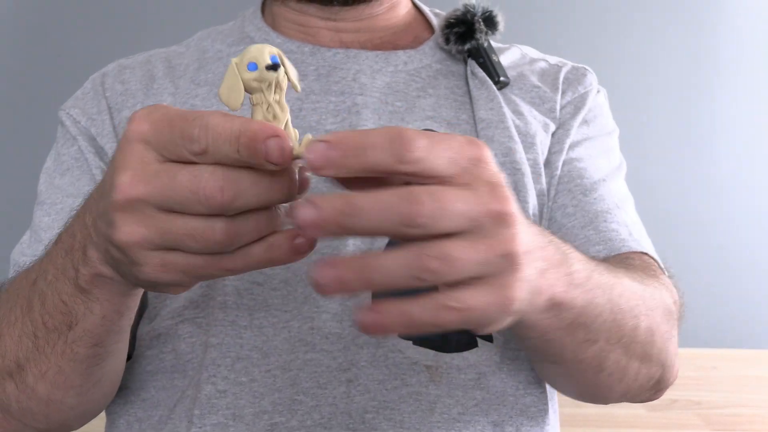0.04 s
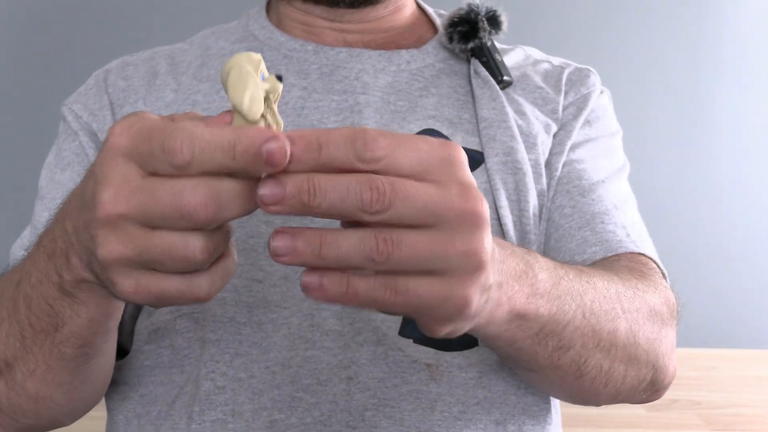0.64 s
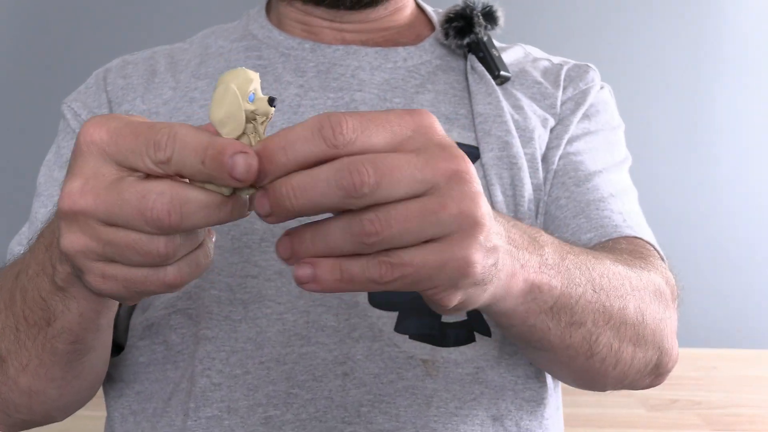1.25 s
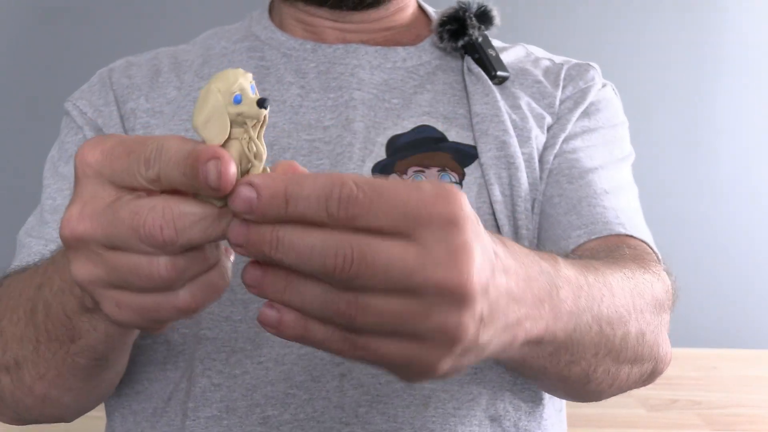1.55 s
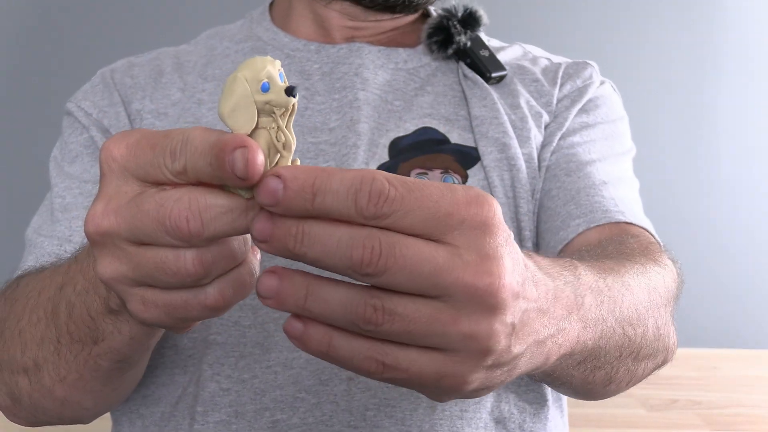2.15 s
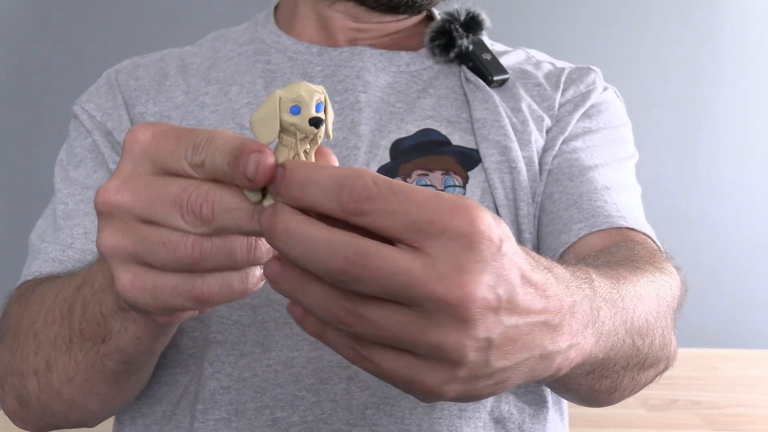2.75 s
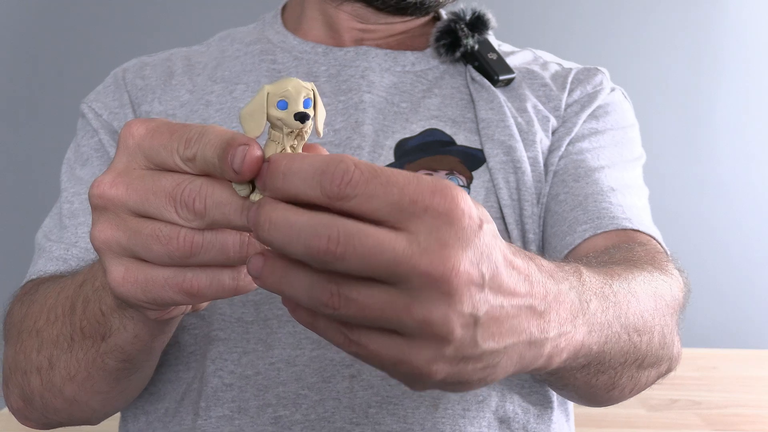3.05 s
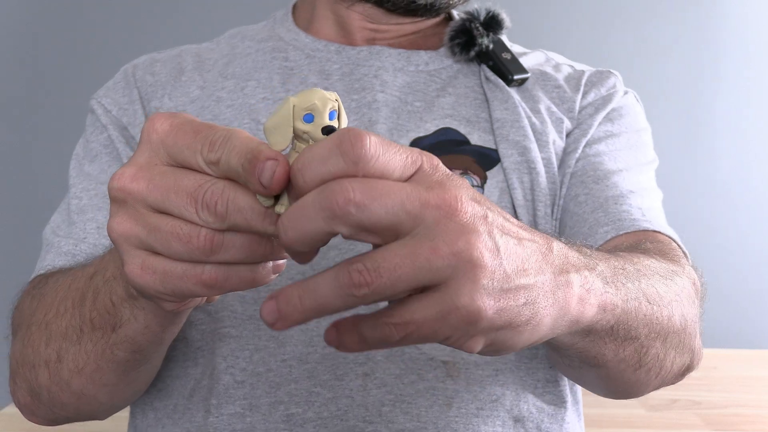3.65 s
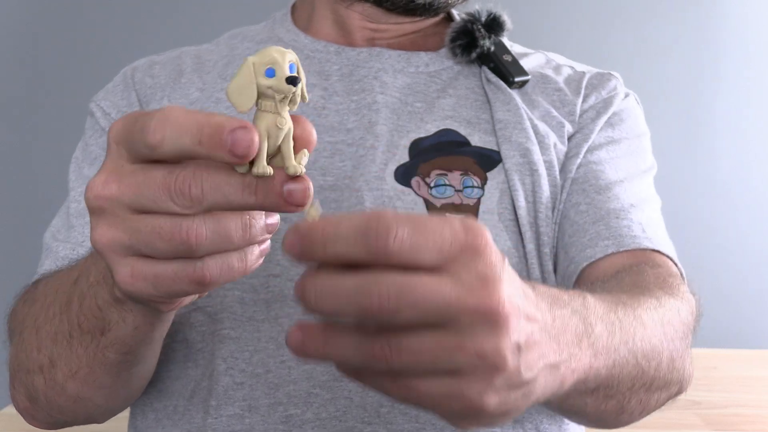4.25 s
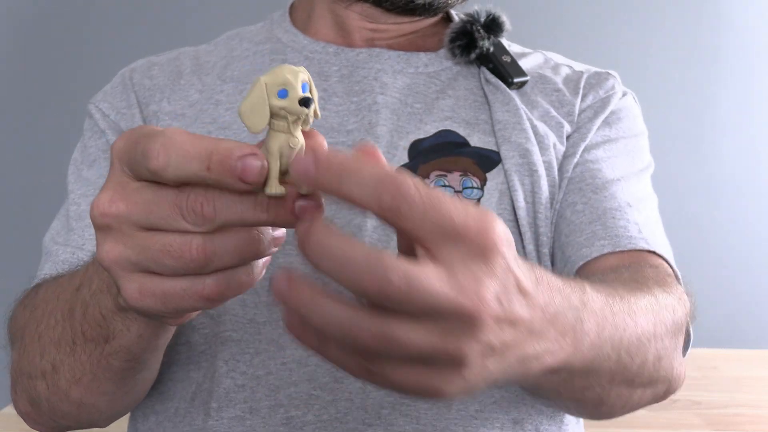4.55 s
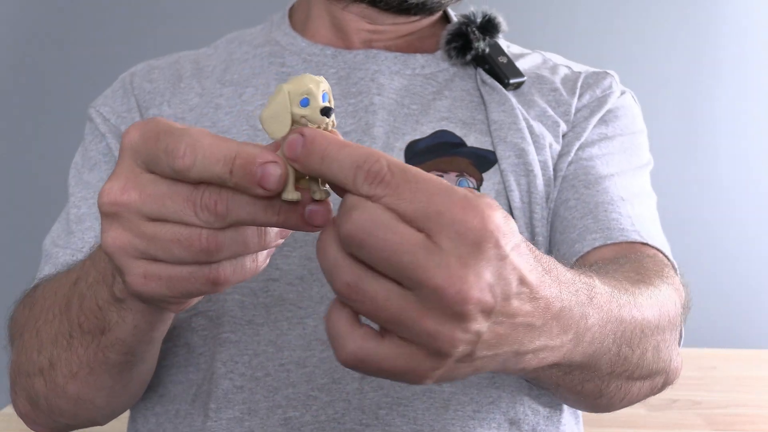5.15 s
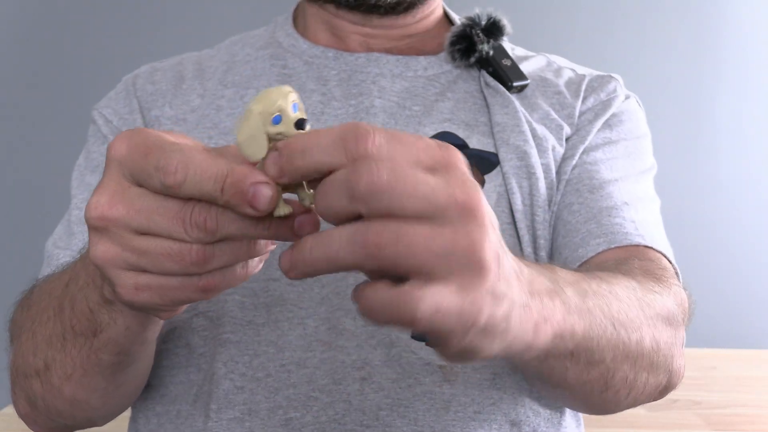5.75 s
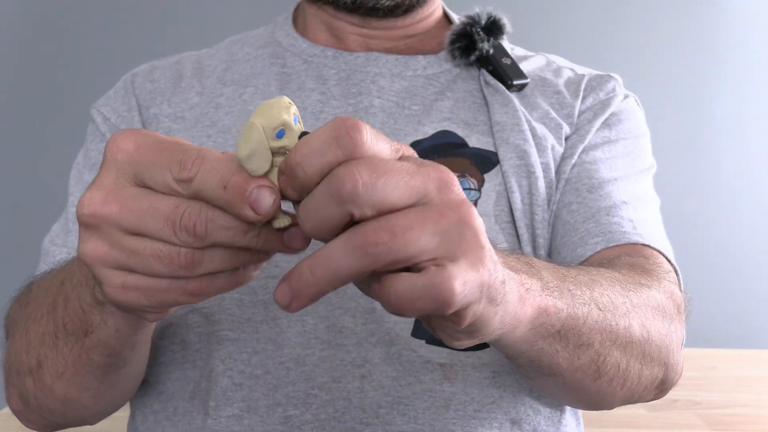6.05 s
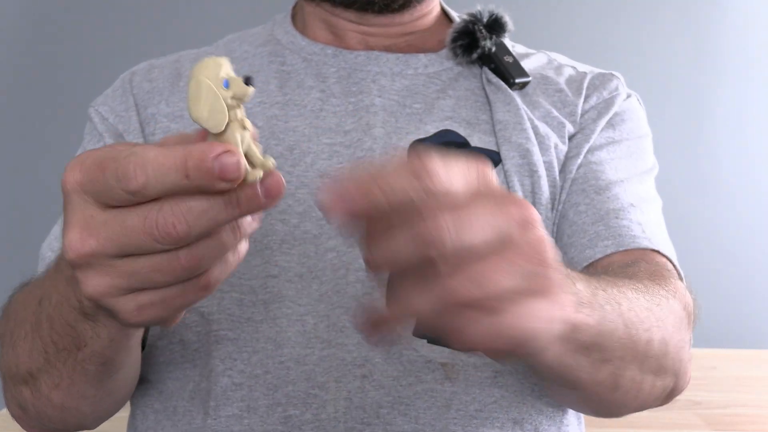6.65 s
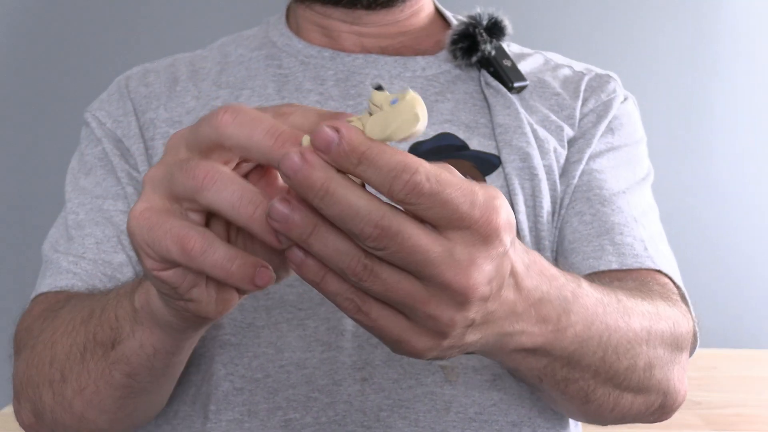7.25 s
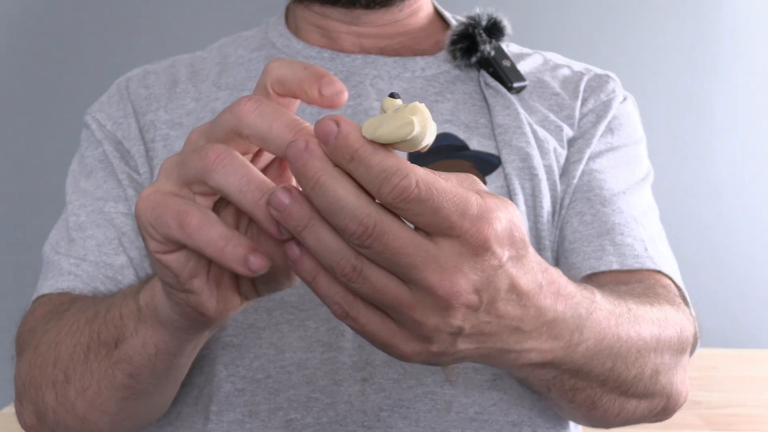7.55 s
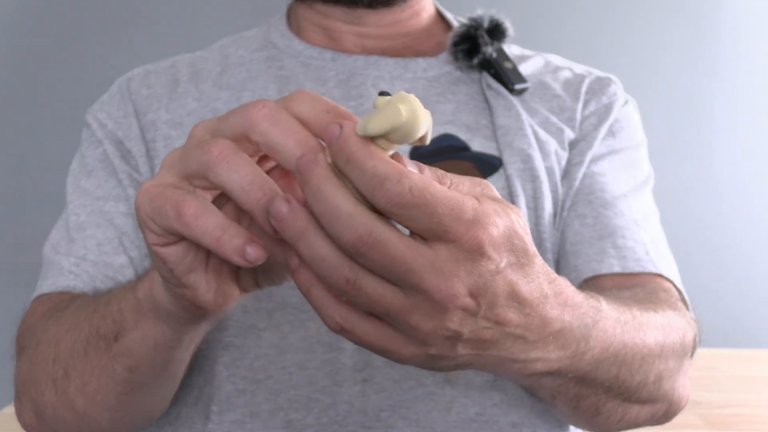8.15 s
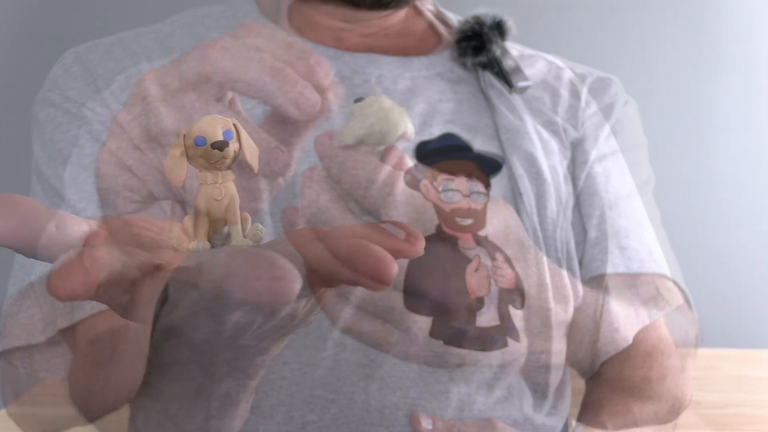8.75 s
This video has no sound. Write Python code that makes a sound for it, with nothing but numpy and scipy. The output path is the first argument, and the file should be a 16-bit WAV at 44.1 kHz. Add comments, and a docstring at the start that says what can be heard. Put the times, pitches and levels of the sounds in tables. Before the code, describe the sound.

In a quiet room with a faint hum and a slight echo, a small plastic figure is picked clean by hand near the microphone. Soft knocks and light fingertip scrapes surround a single click, before the thin supports snap in two tight bursts of high, brittle cracks. Dull wooden knocks sound farther away, a shorter crackle follows, then more knocks and a last little snap. A distant engine is barely audible midway.

```python
"""Fingers snap printed supports off a small plastic figure, close by in a quiet, lightly echoing room.
Each support breaks with a millisecond crack that rings near 9 kHz; a few ring on faintly once free,
and one gives way with two low thuds. Between the breaks, fingertips scrape over the print's ridges.
Duller, woody knocks come from farther off in the room, over air, a faint hum and a distant engine."""
import sys
import numpy as np
from scipy import signal
from scipy.fft import rfft, irfft
from scipy.io import wavfile

SR = 44100
rng = np.random.default_rng(int(sys.argv[2]) if len(sys.argv) > 2 else 0)


def wav_record(signal):
    """Record a signal, one row per channel, as 16-bit PCM in the file named by sys.argv[1]."""
    frames = np.transpose(np.atleast_2d(signal))
    bounded = np.clip(frames, -1, 1)
    # unit amplitude maps onto the largest positive 16-bit level
    quanta = np.round(bounded * 32767).astype(np.int16)
    wavfile.write(sys.argv[1], SR, quanta)


N = 397341

# how long the room's echo takes to fade by 60 dB: (frequency [Hz], fade time [s])
ECHO_FADE = [(200, 0.42), (800, 0.47), (1500, 0.49), (2200, 0.27), (5000, 0.3907), (9000, 0.34),
             (12500, 0.32), (15000, 0.27)]
# the tone of that echo: (frequency [Hz], gain [dB])
ECHO_TONE = [(200, -14), (1500, -10), (3000, -9), (4300, -3.5), (7000, -2), (9000, -2.5), (11000, -4),
             (13500, -9.5), (15800, -9.5)]
# the tone of the room's air: (frequency [Hz], gain [dB])
AIR_TONE = [(12, -27), (20, 1), (65, -5), (81, -13.5), (120, -8), (146, -20.5), (177, -15.5), (285, -13.5),
            (434, -18), (574, -15), (759, -17.5), (949, -20), (2400, -30.5), (4180, -32.5), (8410, -33),
            (16000, -40)]
# standing waves, the notes the room picks out of the air: (pitch [Hz], width [Hz], boost [dB])
STANDING_WAVES = [(58.6, 5, 5), (177.6, 8, 5), (243, 10, 3), (297, 24, 4), (467, 20, 6.5), (595, 20, 4.5),
                  (655, 30, 3.5), (927, 18, 8)]
# mains hum: (pitch [Hz], level [dB])
HUM_NOTES = [(59.5, -79.5), (119.8, -87), (236, -89)]
# the far engine's main note: (time [s], pitch [Hz], level [dB])
ENGINE_PATH = [(2.9, 89.1, -84), (3.4, 89.1, -78), (4.2, 90.92, -72.5), (4.549, 89.8, -71.5),
               (4.8, 82.2, -71.5), (5.25, 80.37, -70.5), (5.65, 80.9, -73), (5.9, 80.9, -91)]

# dull knocks, and two low thuds near 6.2 s as a support gives way: (time [s], level [dB],
# low edge [Hz], high edge [Hz], contact tick [dB], clack pitch [Hz], direct sound [dB])
KNOCKS_AND_THUDS = [(0.4227, -53.5, 424, 1500, -11.5, 2820, -19),
                    (0.426, -47.5, 510, 1620, -12.5, 760, -10), (.755, -55, 790, 1910, -18.5, 2675, -21),
                    (0.9253, -68, 886, 1920, -12, 3500, -10), (1.052, -68.5, 494, 2920, -10.5, 1270, -9),
                    (1.076, -75.5, 900, 3300, -14, 3180, -10), (4.5401, -53.5, 839, 2850, -19, 2420, -14),
                    (4.918, -63, 2083, 3200, -21, 2620, -23), (4.9882, -42.5, 460, 700, -35, 570, -5.5),
                    (4.9927, -43.5, 560, 1150, -25.5, 800, -9), (5.283, -59.5, 573, 1370, -26.5, 3250, -16),
                    (5.4764, -70.5, 698, 2130, -34, 1097, -14),
                    (5.6191, -70.5, 600.4, 3120, -30.5, 3120, -22),
                    (6.164, -62.5, 330.1, 3220, -14, 700, -9), (6.2071, -64, 277, 2600, -13, 590, -6),
                    (7.1421, -40.5, 645, 2220, -26.5, 590, -17),
                    (7.2079, -44.5, 950, 1930, -24.5, 2136, -27), (7.507, -59, 1010, 1703, -26, 1890, -10),
                    (7.7419, -64.5, 990, 2095, -24, 1885, -12), (8.003, -75, 2014, 2720, -22, 2720, -14),
                    (8.056, -74, 1700, 2900, -27.5, 2400, -20)]
# their woody ring: (pitch [Hz], energy relative to the blow [dB], time to fade 60 dB [s])
WOODY_NOTES = [(326.4, -26, 0.49), (470, -29, .35), (517.6, -28, 0.32), (551, -35.5, 0.37),
               (590, -23.5, 0.29), (763, -33, 0.19), (812.7, -23.5, 0.18), (984, -28.5, 0.34),
               (1074.4, -29, 0.57), (1286, -24, 0.33), (1356, -24.5, 0.23), (1443, -26.5, 0.45),
               (1660, -23, 0.43), (1773, -28, 0.37), (1900, -30, 0.32), (1950, -24.5, 0.31),
               (2120, -26.5, 0.46), (2250, -27, 0.32), (3750, -35, 0.35)]
# their hollow tone: (frequency [Hz], gain [dB])
HOLLOW_TONE = [(240, 3), (335, 4), (410, -5), (480, 1.5), (595, 3), (695, -3), (795, -0.5), (900, -6),
               (1000, 1.5), (1120, 0), (1200, -3.5), (1330, -1.5), (1480, 0.5), (1590, -4), (1730, 2.5),
               (1900, -1), (2050, 0), (2350, -0.5), (2900, 0), (3700, 1), (4300, -2.5), (5200, -4),
               (6500, -0.5)]

# firm scrapes: (middle time [s], length [s], level [dB], low resonance [Hz], its share [dB])
FIRM_SCRAPES = [(0.137, 0.068, -75, 4900, -14), (0.644, 0.0516, -74.5, 5200, -1),
                (1.013, 0.055, -70, 5040, -8), (1.128, 0.0377, -67, 5550, -6), (1.56, 0.12, -72, 5600, -16),
                (1.823, 0.31, -77.5, 5000, 2), (1.986, 0.088, -69.5, 5600, 4), (2, 0.014, -69, 5500, 0),
                (2.389, 0.059, -72, 5400, -3), (2.414, 0.042, -63.5, 5430, -1),
                (2.426, .012, -61.5, 5300, 4), (2.491, 0.0216, -63, 5600, 0), (2.703, 0.0334, -75, 4200, 6),
                (4.723, 0.048, -69.5, 5550, -6), (4.898, 0.021, -69, 5550, -6),
                (5.417, 0.046, -72.5, 5550, -3), (5.688, 0.038, -72, 5550, -17),
                (5.801, 0.035, -74, 5600, -9), (6.23, .02, -53.5, 5750, -11), (7.126, 0.087, -75, 5550, -4),
                (7.56, 0.048, -74.5, 5540, -5.5), (8.675, 0.044, -69, 5410, 1)]
# a scrape's low resonance: (multiple of its pitch, gain [dB])
SCRAPE_LOW_TONE = [(.02, -49.5), (.27, -16), (.54, -26), (.83, -6.5), (1, 1.5), (1.19, -10.5), (1.6, -17),
                   (2.9, -39)]
# a scrape's high resonance: (frequency [Hz], gain [dB])
SCRAPE_HIGH_TONE = [(100, -35), (3000, -14), (6700, -10), (8500, 1.5), (9500, -1), (10800, -9.5),
                    (12700, -9), (14000, -15), (16000, -38)]

# freed supports ringing on: (time [s], pitch [Hz], level [dB], time to fade 60 dB [s])
FREED_RINGS = [(6.166, 5790, -59, 0.28), (6.169, 8900, -50, 0.24), (6.227, 8580, -56, .08)]
# breaking supports; shares are relative to the main ring: (time [s], strength [dB], ring pitch [Hz],
# thock share [dB], thock pitch [Hz], body share [dB], body pitch [Hz], top share [dB],
# top tilt [dB/kHz], splinters [dB])
BREAKS = [(1.1602, -40.5, 8700, -15, 1390, -10, 5070, -4.5, -2, -21),
          (2.4913, -56.5, 8900, -30, 1400, 2, 5300, -4.5, 5, -16),
          (3.6425, -42.5, 9190, -10.5, 1403, -10, 5250, -4.5, 3, -24),
          (3.656, -70, 8500, -25, 1400, 0.5, 5300, -6, 0, -22),
          (3.6704, -20, 9200, -23.5, 1310, -10, 4890, -7, 1, -35),
          (3.6708, -23, 9355, -17, 1600, -7, 5070, -6, 1, -16),
          (3.678, -42, 8700, -21.5, 1400, -5, 5400, -1, 0.5, -18),
          (3.684, -42.5, 8300, -18, 1500, -3.5, 5300, -7.5, 0, -22.5),
          (3.6873, -25, 8850, -28, 1500, -12.5, 5050, -10.5, 3, -22),
          (3.6919, -45.5, 9200, -25.5, 1400, -2.5, 5100, 10, 5.5, -22.5),
          (3.7086, -37, 8950, -24, 1400, -10, 5100, -1.5, 4, -17.5),
          (3.7196, -35.5, 9100, -23, 1390, -11.5, 5030, -10.5, 2, -21.5),
          (3.721, -29, 9145, -20.5, 1360, -8, 5070, -6.5, 5, -23),
          (3.8655, -31.5, 9300, -26, 1290, -14.5, 5080, -9.5, 1, -22.5),
          (3.9146, -24.5, 8820, -17.5, 1217, -5.5, 5080, -9.5, -2, -19),
          (3.9157, -7, 9097, -24, 1420, -12, 5050, -10.5, -1, -28),
          (3.9227, -25.5, 8240, -23, 1700, -16, 5070, -14.5, -2, -21),
          (3.9255, -32, 9500, -17, 1600, -9.5, 5077, -14, 0, -12),
          (3.936, -28.5, 8380, -18.5, 1522, 3, 5100, -10.5, 0, -22),
          (3.941, -34.5, 8700, -22, 1400, -14, 5070, -16.5, 0, -15.5),
          (6.1641, -33, 8780, -9, 2000, -11.5, 3770, 0, 3, -30),
          (6.1685, -28, 8250, -26.5, 1289, -18, 5600, -7, -1, -21),
          (6.1728, -36, 8300, -12, 1580, -5, 5290, -4, 4, -10),
          (6.178, -49, 8400, -20, 1400, -14, 5700, -6, 0, -8.5),
          (6.183, -49, 8610, -20.5, 1400, -13, 5696, -5, -3, -8),
          (6.2065, -49, 8430, -3.5, 960, -5, 5700, -1, -0.5, -7),
          (6.219, -50, 8000, -5, 900, -9, 5750, -5, -7, -11),
          (8.1944, -51, 8500, -22, 1750, -3.5, 4020, 1, -2, -16),
          (8.195, -47.5, 10700, -30, 1746, -1, 4810, -9, -2, -19),
          (8.673, -65, 9100, 10, 2630, 0, 5080, -1, -3, -23)]
# the tone of the bare break, before the figure rings: (frequency [Hz], gain [dB])
BREAK_TONE = [(100, -46), (500, -21.5), (1200, -5), (2400, -2), (4500, 0.5), (16000, 1.5)]
# the figure's low notes, its "thock": (multiple of the thock pitch, width [Hz], gain [dB])
THOCK_NOTES = [(1, 520, 1), (1.5, 560, -1.5), (2.3, 560, -4.5), (3.05, 560, -2.5)]
# its body notes, below the main ring: (multiple of the body pitch, width [Hz], gain [dB])
BODY_NOTES = [(.83, 489, -6.5), (1, 619.7, 0), (1.22, 520, -1.5), (1.39, 402.4, -8.5)]
# its top notes, above the main ring: (pitch [Hz], width [Hz], gain [dB])
TOP_NOTES = [(11600, 600, 0), (12650, 750, 0), (14750, 800, -5)]


def gain_of(db):
    """Turns decibels into a number to multiply by."""
    return 10 ** (np.asarray(db) / 20)


def evened(x):
    """Scales a sound to an average (rms) level of 1."""
    return x / np.sqrt(np.mean(x ** 2) + 1e-30)


def read(points, hz):
    """Looks up a frequency in a table, with octaves evenly spaced."""
    f, value = np.transpose(points)
    return np.interp(np.log(hz + 1), np.log(f + 1), value)


def add(mix, s, sound):
    """Mixes a sound in, starting at s seconds."""
    part = mix[max(round(s * SR), 0):][:len(sound)]
    part += sound[:len(part)]


def coloured(x, points):
    """Filters a sound by a table of (frequency [Hz], gain [dB])."""
    return irfft(rfft(x) * gain_of(read(points, np.fft.rfftfreq(len(x), 1 / SR))), len(x))


def pulse(gain):
    """The most sudden click that has the given gain at each frequency."""
    log_gain = np.log(np.maximum(np.r_[gain, gain[-2:0:-1]], 1e-5))
    return np.fft.ifft(np.exp(np.conj(signal.hilbert(log_gain)))).real


def room_air(level_db=-67.5):
    """A soft rumble of air, stronger at the room's standing waves."""
    bins = np.fft.rfftfreq(N, 1 / SR)
    boost_db = sum(db / (1 + (2 * (bins - hz) / width) ** 2) for hz, width, db in STANDING_WAVES)
    spectrum = rfft(rng.standard_normal(N)) * gain_of(read(AIR_TONE, bins) + boost_db)
    return gain_of(level_db) * evened(irfft(spectrum, N))


def mains_hum():
    """The electric supply hums on a few steady notes."""
    t = np.arange(N) / SR
    return np.sqrt(2) * sum(gain_of(db) * np.sin(2 * np.pi * hz * t) for hz, db in HUM_NOTES)


def far_engine(overtone_ratio=1.6, full_speed_hz=91.3, fade_db_per_hz=1.4):
    """A distant engine drones; its overtone fades as it slows down."""
    t = np.arange(N) / SR
    times, *columns = np.transpose(ENGINE_PATH)
    hz, level_db = (np.interp(t, times, column) for column in columns)
    angle = 2 * np.pi * np.cumsum(hz) / SR
    overtone = gain_of(-0.5 + fade_db_per_hz * (hz - full_speed_hz)) * np.sin(overtone_ratio * angle)
    return np.sqrt(2) * gain_of(level_db) * (np.sin(angle) + overtone)


def echo_tail(size=18176):
    """A wash of echoes with energy 1; each frequency fades at its own speed."""
    hz, t, bands = signal.stft(rng.standard_normal(size), SR, nperseg=256)
    fade = gain_of(-60 * t / read(ECHO_FADE, hz)[:, None])
    echoes = signal.istft(bands * fade, SR)[1][:size]
    return echoes / np.linalg.norm(echoes)


def room_echo(x, table_s=0.012, table_db=-17, early_db=-3, build_s=0.0074):
    """One echo from the table top, and a wash that fills in as the walls answer."""
    echoes = coloured(np.pad(echo_tail(), (256, 0)), ECHO_TONE)[256:]
    t = np.arange(len(echoes)) / SR
    echoes *= gain_of(early_db * np.exp(-(t / build_s) ** 2))
    add(echoes, table_s, gain_of([table_db]))
    return signal.fftconvolve(x, echoes)


def knock_answer(direct_db, wash_db=-2, bounce_db=-3, bounce_s=.0038):
    """What one blow sets off: direct sound, a quick echo, the room's wash and a woody ring."""
    answer = gain_of(wash_db) * echo_tail()
    t = np.arange(len(answer)) / SR
    answer[0] += gain_of(direct_db)
    add(answer, bounce_s, gain_of([direct_db + bounce_db]))
    for hz, db, fade_s in WOODY_NOTES:
        note = np.sin(2 * np.pi * (hz * t + rng.random())) * gain_of(-60 * t / fade_s)
        answer += gain_of(db) * note / np.linalg.norm(note)
    return answer


def knocks_and_thuds(steepness=3.96, tick_edge_hz=9000, clack_width_hz=260, size=4096):
    """Dull knocks, and two low thuds as a support gives way; a softer contact sounds duller."""
    out, hz = np.zeros(N), np.fft.rfftfreq(size, 1 / SR) + 1
    tick = 1 / np.hypot(1, (hz / tick_edge_hz) ** 3)
    for s, db, low_hz, high_hz, tick_db, clack_hz, direct_db in KNOCKS_AND_THUDS:
        thud = 1 / np.hypot(1, (hz / high_hz) ** steepness)
        # each one clacks at its own pitch, less the further that lies above the high edge
        clack_gain = gain_of(-1) / np.hypot(1, clack_hz / high_hz)
        clack = clack_gain / (1 + ((hz - clack_hz) / clack_width_hz) ** 2)
        contact = np.hypot(thud + clack, gain_of(tick_db) * tick)
        bass_cut = 1 / np.hypot(1, (low_hz / hz) ** 3)
        blow = pulse(gain_of(read(HOLLOW_TONE, hz)) * contact * bass_cut)
        knock = signal.fftconvolve(blow, knock_answer(direct_db))
        add(out, s, gain_of(db) * knock / np.std(knock[:size // 2]))
    return out


def light_brushes(count=8, typical_s=.045, db=-83.5, low_hz=5400, low_db=-12):
    """Light touches at random moments as the figure is turned: rows like those of FIRM_SCRAPES."""
    return [(when * N / SR, typical_s * (.5 + stretch), db, low_hz, low_db)
            for when, stretch in rng.random((count, 2))]


def scrapes(slips_per_s=2500, spread_db=3):
    """A fingertip slips over the print's ridges in a swell of tiny clicks that stir two resonances."""
    out = np.zeros(N)
    for s, length, db, low_hz, low_db in FIRM_SCRAPES + light_brushes():
        size = int(length * SR)
        low_tone = [(ratio * low_hz, level) for ratio, level in SCRAPE_LOW_TONE]
        slips = (rng.random(size) < slips_per_s / SR) * rng.choice([-1, 1], size)
        slips = slips * gain_of(spread_db * rng.standard_normal(size))
        rub = coloured(slips, SCRAPE_HIGH_TONE) + gain_of(low_db) * coloured(slips, low_tone)
        add(out, s - length / 2, gain_of(db) * evened(rub) * np.hanning(size))
    return out


def freed_supports(wobble_hz=70):
    """A freed support rings on faintly and unevenly between the fingers."""
    out, t = np.zeros(N), np.arange(SR // 2) / SR
    smoothing = np.exp(-np.pi * wobble_hz / SR)
    for s, hz, db, fade_s in FREED_RINGS:
        wobble = evened(signal.lfilter([1], [1, -smoothing], rng.standard_normal(len(t))))
        ring = np.sin(2 * np.pi * np.cumsum(hz + wobble_hz * wobble) / SR)
        add(out, s, gain_of(db - 60 * t / fade_s) * ring)
    return out


def plastic_ring(notes, t):
    """Notes that swell and die within a millisecond or two, wider ones sooner; the peak is 1."""
    ring = 0
    for hz, width, db in notes:
        age = 2 * np.pi * width * t
        ring = ring + gain_of(db) * width * age ** 2 * np.exp(-age) * np.sin(2 * np.pi * hz * t)
    return ring / abs(ring).max()


def cracks(ring_width_hz=830, blur_width_hz=1400, splinter_s=0.0031, bass_cut_hz=730):
    """Each break is a bare click that sets the figure ringing, with tiny splinters after it."""
    out, t = np.zeros(N), np.arange(512) / SR
    click = pulse(gain_of(read(BREAK_TONE, np.fft.rfftfreq(len(t), 1 / SR))))
    # so small a figure gives off almost no bass
    bass_cut = signal.butter(4, bass_cut_hz, "high", fs=SR, output="sos")
    for s, strength_db, ring_hz, thock_db, thock_hz, body_db, body_hz, top_db, tilt, chip_db in BREAKS:
        thock = [(ratio * thock_hz, width, db) for ratio, width, db in THOCK_NOTES]
        body = [(ratio * body_hz, width, db) for ratio, width, db in BODY_NOTES]  # shifted by the grip
        top = [(hz, width, db + tilt * (hz - ring_hz) / 1000) for hz, width, db in TOP_NOTES]
        snap = plastic_ring([(ring_hz, ring_width_hz, 0)], t)
        for share_db, notes in (thock_db, thock), (body_db, body), (top_db, top):
            snap = snap + gain_of(share_db) * plastic_ring(notes, t)
        bare = gain_of(11) * np.hypot(gain_of(body_db), gain_of(top_db)) * click
        splinters = rng.standard_normal(len(t)) * (rng.random(len(t)) < .1)
        force = gain_of(chip_db) * splinters * np.exp(-t / splinter_s)
        force[0] = 1  # the break itself
        near = np.convolve(force, gain_of(3.5) * snap + gain_of(-20) * bare)
        add(out, s, gain_of(strength_db) * signal.sosfilt(bass_cut, near))
        # the room gathers sound from all directions, which blurs the notes into one broad hump
        blur = gain_of(-11) * plastic_ring([(ring_hz, blur_width_hz, 0)], t)
        add(out, s, gain_of(strength_db) * (room_echo(bare) + room_echo(blur)))
    return out


def scene(scrape_echo_db=-5, width_db=-42, hiss_db=-85):
    """Everything sits in the middle; left and right differ only by a trace and a faint hiss."""
    rub = scrapes()
    mono = cracks() + freed_supports() + rub + gain_of(scrape_echo_db) * room_echo(rub)[:N]
    mono += knocks_and_thuds() + room_air() + mains_hum() + far_engine()
    side = gain_of(width_db) * signal.hilbert(mono).imag + gain_of(hiss_db) * rng.standard_normal(N)
    return np.array([mono + side, mono - side])


def record(dry):
    """Cuts the very highest treble, above 16250 Hz."""
    treble_cut = signal.firwin(511, 16250, window=("kaiser", 8), fs=SR)
    return signal.oaconvolve(dry, treble_cut[None], "same")


dry = scene()
out = record(dry)
wav_record(out)
```